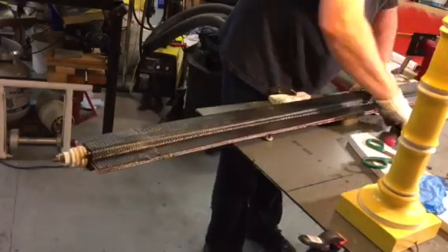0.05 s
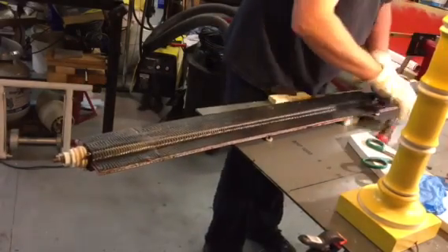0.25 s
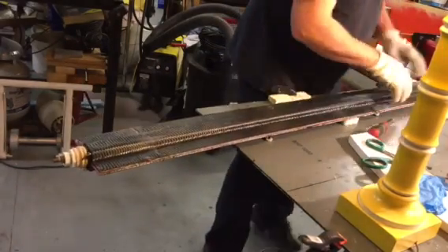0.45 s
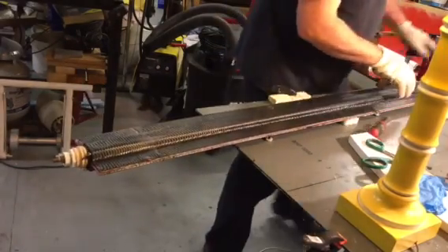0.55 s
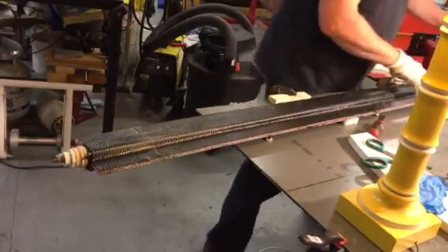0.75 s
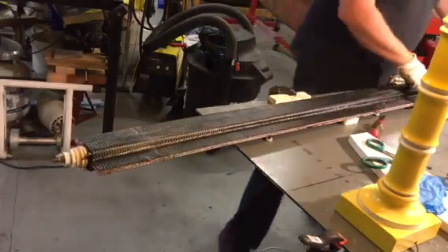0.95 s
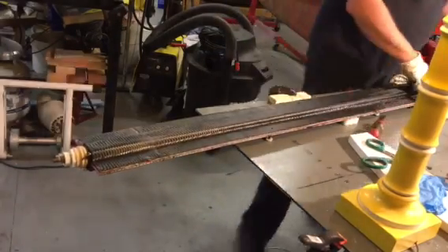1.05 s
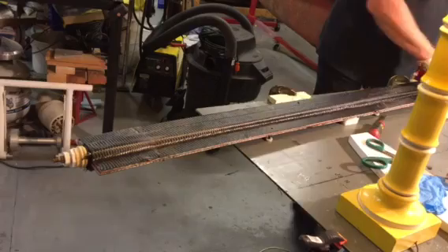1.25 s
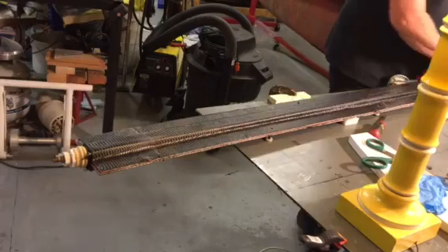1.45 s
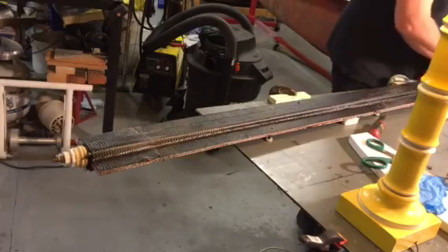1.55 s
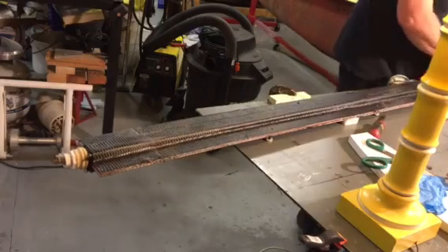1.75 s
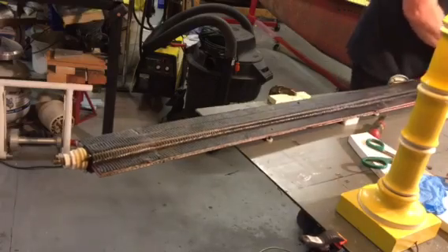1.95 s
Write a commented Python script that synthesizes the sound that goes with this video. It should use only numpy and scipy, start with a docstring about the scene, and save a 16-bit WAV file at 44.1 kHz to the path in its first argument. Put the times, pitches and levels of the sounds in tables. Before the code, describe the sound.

Loud cracking of a stiff mold being pried open, with faint ticks first, a gritty crunch, bench thuds and metal tool clinks, then small snaps and peeling over a low machine hum in a live workshop, close microphone.

```python
"""A stiff mold is pried apart on a workshop bench while a machine hums low, a wavering sine over a drone.
Faint ticks lead into loud seam cracks, runs of slips that ring the shell, as knocks ring the bench modes
and dense grains grind. A steel tool then clinks twice, in clusters of beating modes. Peeling hiss, banded
noise in bursts, starts with the prying and returns with smaller cracks and knocks; a thin squeak joins the
longest peel. Handling rustle, hall air and diffuse echoes surround the work."""
import sys
import numpy as np
from scipy import signal
from scipy.io import wavfile

SR = 44100
rng = np.random.default_rng(int(sys.argv[2]) if len(sys.argv) > 2 else 0)


def digitize_waveform(pressure):
    """Quantize a signal to 16-bit integers and store it at the path in sys.argv[1].

    Rows of a 2-D input are taken as channels; values are limited to [-1, 1].
    """
    field = np.atleast_2d(pressure).T
    bounded = np.clip(field, -1, 1)
    quanta = np.round(bounded * 32767).astype(np.int16)
    wavfile.write(sys.argv[1], SR, quanta)


def gain_from_db(level_db):
    """Convert decibel levels to linear amplitude factors (20 dB per decade)."""
    decades = np.asarray(level_db, float) / 20
    return 10 ** decades


N = 88200
T = np.arange(N) / SR

# Modes of the bench top: f/Hz, relative level/dB, t60/s
BENCH_MODES = [(141.5, -7.5, 0.34), (181.7, -0.5, .08), (257, -0.5, 0.1), (300, -2, 0.19),
               (352.6, 0.5, .08), (362, -6, 0.096), (600, 2, 0.13)]


def rms_one(x):
    """Scale to rms 1."""
    return x / np.sqrt(np.mean(x ** 2) + 1e-20)


def at_hz(points, hz):
    """Read a table on a log-frequency axis."""
    table_hz, values = np.transpose(points)
    return np.interp(np.log(hz), np.log(table_hz), values)


def drift(rate_hz):
    """Random drift of spread 1: noise through two equal low-pass poles at the rate."""
    r = np.exp(-2 * np.pi * rate_hz / SR)
    noise = rng.standard_normal(N + SR)
    return rms_one(signal.lfilter([1], [1, -2 * r, r * r], noise)[SR:])


def ring(clicks, hz, t60):
    """A resonator: a unit click sets off a dying sine of height 1; t60 is at least 4 ms."""
    r = gain_from_db(-60 / (max(t60, .004) * SR))
    w = 2 * np.pi * hz / SR
    return signal.lfilter([0, np.sin(w)], [1, -2 * r * np.cos(w), r * r], clicks + 1e-18)


def body(force, modes, scatter_db):
    """All modes of a body ring together, each struck with a chance strength of its own."""
    out = 0
    for hz, db, t60 in modes:
        strength = gain_from_db(db + scatter_db * rng.standard_normal())
        out = out + strength * ring(force, hz, t60)
    return out


def add(out, sound, s, peak_db):
    """Place a sound at its time and peak level."""
    i = int(s * SR)
    levelled = gain_from_db(peak_db) * sound / np.abs(sound).max()
    out[i:i + len(sound)] += levelled[:N - i]


def bands():
    """Third-octave band-passes from 25 Hz up, with their centres."""
    edges = 25 * 2 ** (np.arange(29) / 3)
    return [(np.sqrt(low * high), signal.butter(2, [low, high], "band", fs=SR, output="sos"))
            for low, high in zip(edges, edges[1:])]


def coloured(spectrum, patchy_db):
    """Noise in bands, each with its own level and flicker; rms 1."""
    white = rng.standard_normal((2, N + SR // 2))
    out = 0
    for k, (hz, sos) in enumerate(bands()):
        level = gain_from_db(at_hz(spectrum, hz) + patchy_db * drift(8.6))
        out = out + level * signal.sosfilt(sos, white[k % 2])[-N:]  # neighbours use separate noises
    return rms_one(out)


def air():
    """Steady hall noise with a patchy, mostly low spectrum."""
    # Colour of the hall noise: f/Hz, relative density/dB per Hz
    spectrum = [(25, -22), (45, -9), (100, -0.5), (160, -6), (370, -12.5), (480, -31.5), (900, -27.5),
                (4800, -42.5), (16000, -49)]
    return gain_from_db(-55) * coloured(spectrum, patchy_db=3.5)


def hum():
    """A low sine that wavers in level and pitch, over a drone of twice-resonated noise."""
    # Machine tone loudness: t/s, rms level/dB around which it wavers
    tone_level = [(0, -55.5), (.15, -51.5), (.5, -64.5), (.8, -50.5), (1.1, -49), (1.55, -50), (2, -42.5)]
    # Machine tone pitch: t/s, f/Hz around which it wavers
    tone_pitch = [(1.1, 92.52), (1.3, 87.3), (2, 88.6)]
    waver_hz, waver_db = 1.3, 2.3
    drone_hz, drone_db, drone_t60_s = 61, -57, 0.11
    hz = np.interp(T, *np.transpose(tone_pitch)) + waver_hz * drift(19)
    db = np.interp(T, *np.transpose(tone_level)) + waver_db * drift(24)
    tone = np.sqrt(2) * gain_from_db(db) * np.sin(2 * np.pi * np.cumsum(hz) / SR)
    once = ring(rng.standard_normal(N + SR), drone_hz, drone_t60_s)
    drone = ring(once, drone_hz, drone_t60_s)[SR:]
    return tone + gain_from_db(drone_db) * rms_one(drone)


def rustle():
    """Patchy mid noise of hands and gloves at work, its level swelling and fading."""
    # Loudness of the handling: t/s, rms level/dB
    handling = [(0, -55), (.07, -72.5), (.16, -52), (.7, -60.5), (.85, -81.5), (1.05, -61), (1.3, -81),
                (1.42, -57.5), (1.58, -60.5), (1.78, -60), (2, -63)]
    # Colour of the rustle: f/Hz, relative density/dB per Hz
    spectrum = [(250, -8), (500, 10.5), (1500, 5.5), (3500, -3), (6000, -10.5), (9000, -16.5)]
    return gain_from_db(np.interp(T, *np.transpose(handling))) * coloured(spectrum, patchy_db=2.5)


def peels():
    """Bright grainy hiss as stuck surfaces let go: bursts shape the power of banded noise."""
    # Peeling bursts: t/s, relative level/dB, rise/s, t60/s
    bursts = [(0.179, -24.5, 0.01, 0.12), (0.716, -44, 0.0009, 0.033), (0.965, -52.5, 0.0025, 0.059),
              (1.018, -47, .005, 0.2), (1.079, -50.5, 0.012, 0.47), (1.182, -39.5, 0.0033, 0.34),
              (1.365, -44, 0.013, 0.41), (1.491, -47.5, 0.0028, 0.08), (1.548, -37.5, 0.033, 0.16),
              (1.659, -45.5, 0.0045, 0.27), (1.851, -53, 0.015, 0.087)]
    # Colour of the hiss: f/Hz, relative density/dB per Hz
    spectrum = [(1800, -32.5), (3000, 1.5), (5000, 0.5), (8000, 8.5), (11000, 3.5), (15500, 4.5)]
    bite_db, bite_s = 3.5, 0.0039  # extra level at each onset, and its decay time
    power = np.zeros(N)
    for s, db, rise, t60 in bursts:
        t = np.maximum(T - s, 0)
        swell = np.minimum(t / rise, 1) ** 2
        fade = gain_from_db(-120 * t / t60 + 2 * bite_db * np.exp(-t / bite_s))  # doubled dB, as this is power
        power += gain_from_db(db) ** 2 * swell * fade
    grain = gain_from_db(-10 + 2 * drift(110))
    return np.sqrt(power) * grain * coloured(spectrum, patchy_db=2)


def squeak():
    """A thin squeak with the longest peel: noise through one narrow high resonance."""
    # Onsets of the squeak: t/s, level/dB, t60/s
    onsets = [(1.14, -61, .08), (1.184, -50, .25)]
    level = np.zeros(N)
    for s, db, t60 in onsets:
        rise = np.clip((T - s) / 0.0012, 0, 1)
        level += gain_from_db(db - 60 * np.maximum(T - s, 0) / t60) * rise
    return level * rms_one(ring(rng.standard_normal(N), hz=8150, t60=.013))


def clinks():
    """Steel rings in clusters of thirty close modes that beat and die away after a hard start."""
    # Clinks of the tool: t/s, peak level/dB
    strikes = [(0.271, -22), (.466, -16)]
    # Clusters of crowded tool modes: f/Hz, relative level/dB, t60/s
    clusters = [(1370, -2, 0.26), (2400, 0.5, 0.32), (2800, -1, 0.36), (4000, -1, 0.28), (5294, -4, 0.16),
                (6080, -10.5, 0.29), (8000, -17, 0.28)]
    cluster_width = .085  # spread as a share of the cluster's frequency
    rise_s, bite_db, bite_s = .002, 14, 0.0036
    out, t = np.zeros(N), T[:SR // 2]
    for s, db in strikes:
        sound = 0
        for hz, level_db, t60 in clusters:
            spread, phase = rng.standard_normal((2, 30, 1))
            mode_hz = hz * (1 + cluster_width * spread)
            beating = np.sum(np.sin(2 * np.pi * (mode_hz * t + phase)), axis=0)
            sound = sound + gain_from_db(level_db - 60 * t / t60) * rms_one(beating)
        bite = gain_from_db(bite_db * np.exp(-t / bite_s))
        add(out, sound * np.minimum(t / rise_s, 1) * bite, s, db)
    return out


def crunch():
    """The levered seam grinds: dense short grains ring at many pitches and also shake the bench."""
    # Loudness of the grinding: t/s, rms level/dB of the grains and of the shaken bench alike
    grinding = [(.17, -61), (.2, -34.5), (.25, -34), (.33, -48), (.4, -42.5), (.46, -42.5), (.6, -64)]
    grains_per_s, low_hz, high_hz, voices = 1800, 485.5, 3500, 16
    cycles = 7  # t60 in cycles, where the shortest ring allows
    sizes = gain_from_db(4.395 * np.minimum(rng.exponential(1, N), 5))
    sizes = sizes * rng.choice([-1, 1], N) * (rng.random(N) < grains_per_s / SR)
    dealt = rng.integers(0, voices, N)  # each grain gets one pitch
    grains = 0
    for k, hz in enumerate(np.geomspace(low_hz, high_hz, voices)):
        grains = grains + ring(sizes * (dealt == k), hz, cycles / hz)
    grains = signal.sosfilt(signal.butter(2, high_hz / 2, fs=SR, output="sos"), grains)
    shaken = rms_one(body(sizes, BENCH_MODES, scatter_db=0.5))
    level = gain_from_db(np.interp(T, *np.transpose(grinding), left=-120, right=-120))
    return (rms_one(grains) + shaken) * level


def knocks():
    """A short rough contact rings the bench modes near the spot that is struck."""
    # Knocks of the mold on the bench: t/s, peak level/dB, centre f/Hz
    hits = [(.175, -34, 368), (0.196, -27.5, 151), (0.26, -16, 290), (0.265, -25.5, 143.6),
            (.342, -18, 294), (0.35, -24, 141), (0.442, -30.5, 320), (0.623, -38, 330), (0.719, -36.5, 360),
            (0.746, -37, 257), (0.899, -39.5, 368), (.963, -41.5, 287), (1.032, -41, 358),
            (1.198, -46, 390), (1.354, -47, 257), (1.439, -37.5, 309), (1.663, -33.5, 275)]
    contact_s, width = 0.0035, .55  # contact decay time; width as a share of the centre
    out, t = np.zeros(N), T[:SR // 3]
    for s, db, hz in hits:
        force = (1 + rng.standard_normal(len(t))) * np.exp(-t / contact_s)
        spot = signal.iirpeak(hz, 1 / width, SR)
        for _ in range(2):
            force = signal.lfilter(*spot, force)
        add(out, body(force, BENCH_MODES, scatter_db=4.5), s, db)
    return out


def cracks():
    """A dying run of slips, coloured by where the seam lets go, direct and through the shell."""
    # Seam cracks: t/s, peak level/dB, centre f/Hz, filter width/share of centre, run length/s
    runs = [(.082, -39, 1040, 1.44, 0.032), (.104, -35.5, 2780, 1.2, 0.0094), (.149, -41, 2800, 0.4, 0.015),
            (.173, -19.5, 1120, 2.75, 0.0059), (.227, -26.5, 1720, 0.51, 0.021),
            (.259, 0, 1445, 0.9, 0.0038), (.263, -4, 2410, 0.97, 0.0046), (.269, -13.5, 3798, 1.4, 0.023),
            (0.262, -20, 9800, 0.88, 0.028), (.280, -15.5, 2593, 3, 0.041), (.338, -13, 1300, 1.35, 0.014),
            (0.344, -27, 5010, 1.4, 0.033), (.713, -40, 1000, 1.37, 0.011), (.895, -44.5, 950, 0.96, 0.017),
            (.960, -52, 900, .7, 0.012), (1.030, -50, 835, .9, 0.026), (1.183, -33.5, 13000, 0.65, 0.01),
            (1.195, -47.5, 1050, 1.43, .01), (1.443, -47, 750, 0.38, 0.012),
            (1.494, -33.5, 2025, 0.2, 0.008), (1.494, -37, 3050, 2, 0.032),
            (1.511, -36.5, 2090, 0.13, .005), (1.660, -25.5, 1000, 1.4, 0.012),
            (1.661, -35.5, 4050, 0.28, 0.011), (1.661, -41, 2240, 0.33, 0.013),
            (1.832, -45, 1000, 0.46, 0.0026), (1.874, -38, 2200, 1.47, 0.0068),
            (1.892, -40, 2000, 1.33, 0.0097)]
    # Modes of the mold shell: f/Hz, relative level/dB, t60/s
    shell = [(730, -17.5, 0.03), (1000, 5, 0.016), (1341, 5.5, 0.037), (1539, 3, .05), (2282, -4.5, 0.089),
             (2685, 0.5, 0.02), (4300, -17, 0.046), (6080, -24, 0.079)]
    slips_per_s, slip_spread_db, swell_s = 4000, 5, .002
    shell_db = -9  # peak of the shell against the direct sound
    out, t = np.zeros(N), T[:SR // 5]
    for s, db, hz, width, run in runs:
        slips = (rng.random(len(t)) < slips_per_s / SR) * rng.choice([-1, 1], len(t))
        sizes = gain_from_db(slip_spread_db * rng.standard_normal(len(t)))
        envelope = np.minimum(t / swell_s, 1) * np.exp(-(t / run) ** 2)
        direct = slips * sizes * envelope
        place = signal.iirpeak(hz, 1 / width, SR)
        for _ in range(3):
            direct = signal.lfilter(*place, direct)
        rung = body(direct, shell, scatter_db=2.5)
        both = direct / np.abs(direct).max() + gain_from_db(shell_db) * rung / np.abs(rung).max()
        add(out, both, s, db)
    return out


def hall(x):
    """Diffuse echoes: noise that dies band by band, of unit energy."""
    # Decay of the hall: f/Hz, t60/s
    decay = [(100, 0.61), (400, 0.74), (2000, 0.56), (6000, 0.52), (14000, 0.11)]
    t, white = T[:SR], rng.standard_normal((2, SR))
    tail = 0
    for k, (hz, sos) in enumerate(bands()):
        tail = tail + signal.sosfilt(sos, white[k % 2]) * gain_from_db(-60 * t / at_hz(decay, hz))
    tail = tail * np.clip(t / 0.0039 - .5, 0, 1)  # silent for about 2 ms, full by about 6 ms
    return signal.fftconvolve(x, tail / np.sqrt(np.sum(tail ** 2)))[:N]


def scene():
    """Work on the bench without its deep bass, with its echo, rustle, hum and air."""
    work = cracks() + knocks() + clinks() + peels() + squeak() + crunch()
    work = signal.sosfilt(signal.butter(4, 115, "high", fs=SR, output="sos"), work)
    echo = gain_from_db(-13.5) * hall(work)
    return (work + echo + rustle() + hum() + air())[None]


def top_cut(x):
    """Nothing passes above the cut-off."""
    return signal.sosfilt(signal.butter(12, 16800, fs=SR, output="sos"), x)


def record(dry):
    """A small microphone that rounds peaks, with a low cut and a steep top edge."""
    rounded = np.tanh(dry)
    mic = signal.sosfilt(signal.butter(2, 45, "high", fs=SR, output="sos"), rounded)
    mix = signal.sosfilt(signal.cheby2(10, 35, 16200, fs=SR, output="sos"), mic)
    return top_cut(mix)


dry = scene()
out = record(dry)
digitize_waveform(out)
```